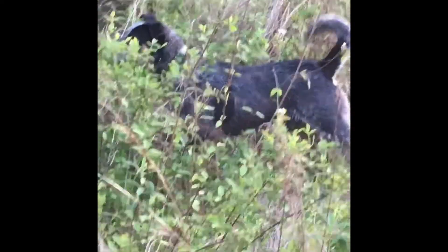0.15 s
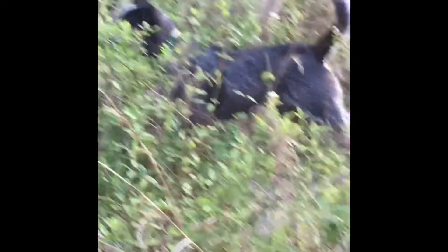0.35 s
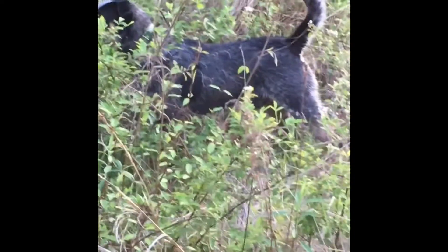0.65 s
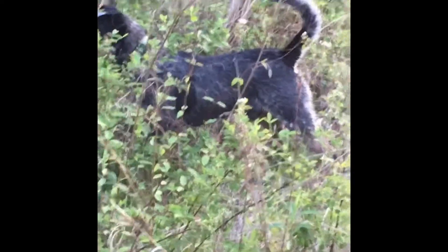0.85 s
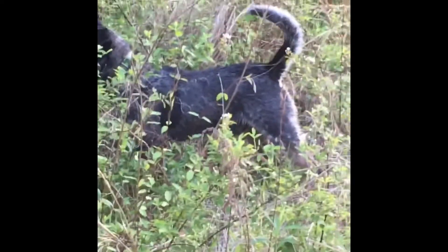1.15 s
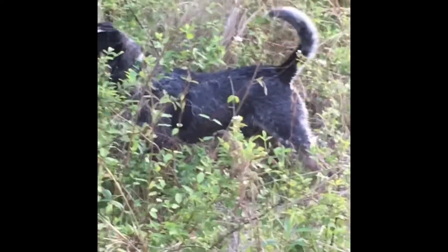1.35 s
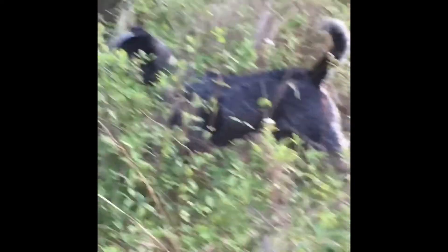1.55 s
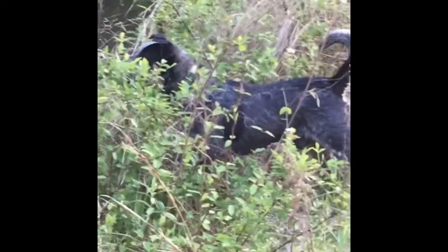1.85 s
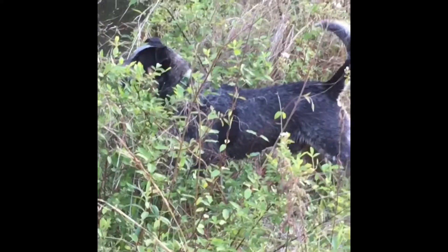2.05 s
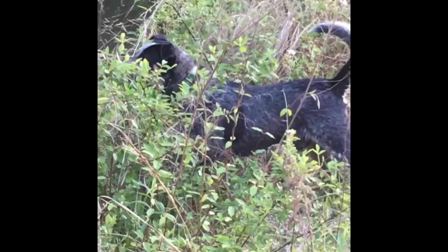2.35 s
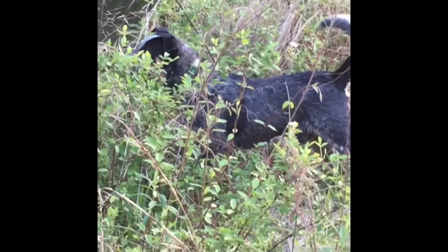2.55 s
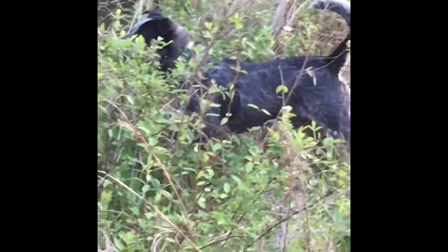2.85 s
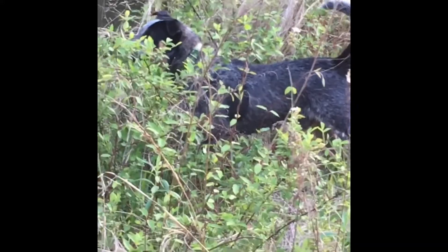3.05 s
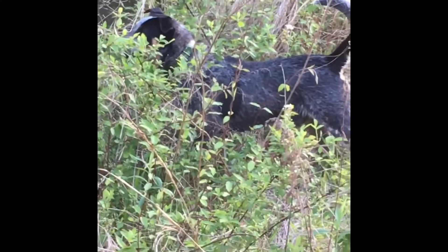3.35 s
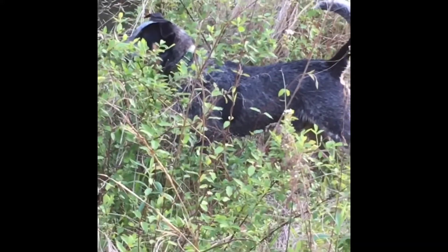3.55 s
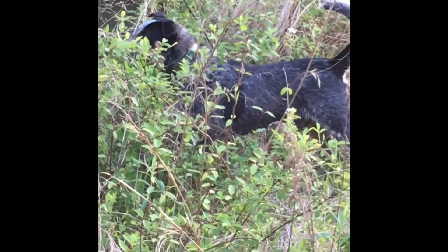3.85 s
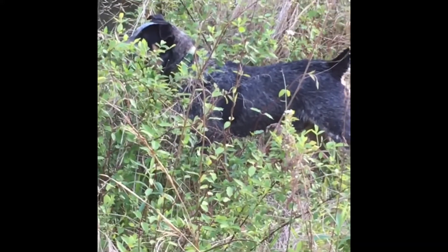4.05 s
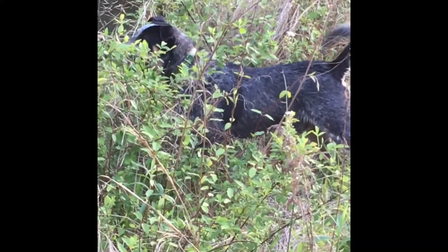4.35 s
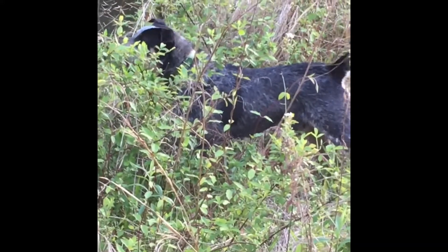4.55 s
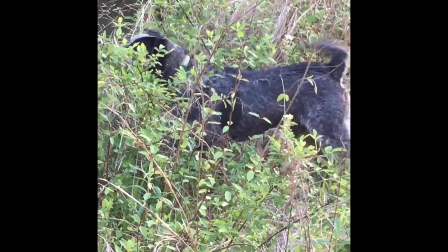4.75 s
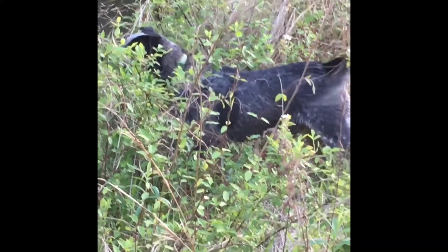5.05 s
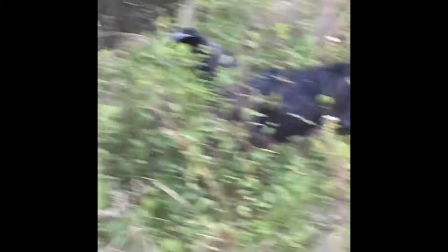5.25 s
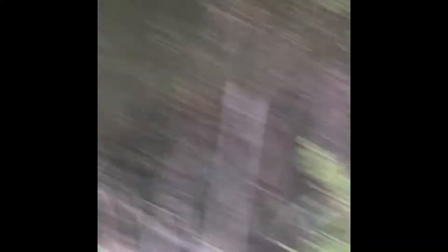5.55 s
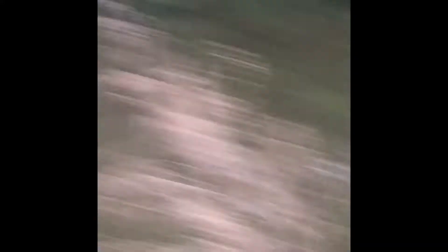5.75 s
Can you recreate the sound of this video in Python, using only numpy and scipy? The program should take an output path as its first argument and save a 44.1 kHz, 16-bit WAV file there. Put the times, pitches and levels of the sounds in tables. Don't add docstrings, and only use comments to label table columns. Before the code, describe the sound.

A large dog barks twice late on, sharp and rough, beside a pond, over a steady insect drone and soft low rumble.

```python
import sys
import numpy as np
from scipy import signal
from scipy.fft import rfft, irfft, next_fast_len
from scipy.io import wavfile
from scipy.ndimage import uniform_filter1d, map_coordinates

SR = 44100
rng = np.random.default_rng(int(sys.argv[2]) if len(sys.argv) > 2 else 0)


def magnitude_from_level(level_db):
    exponent = np.asarray(level_db, float) / 20
    return 10 ** exponent


def master(y):
    cut = np.clip(np.atleast_2d(y).T, -1, 1)
    pcm = np.round(cut * 32767)
    wavfile.write(sys.argv[1], SR, pcm.astype(np.int16))


N = 260454

# time in seconds, pitch in Hz, level in dB, brightness in dB per octave, roughness from 0 to 1.
LOW_FOLD = [
    [(4.600, 340, -50, -12, .5), (4.631, 295, -28, -16, .25), (4.643, 312, -6, -18, .1),
     (4.651, 410, -17, -5, .2), (4.668, 475, -12, -2, .2), (4.684, 492, -16, -2, .4),
     (4.708, 486, -44, -2, .4), (4.750, 468, -14, -4, .1), (4.773, 432, -22, -5, .1)],
    [(5.450, 350, -54, -8, .8), (5.473, 300, -22, -6, .8), (5.485, 305, -15, -10, .4),
     (5.494, 362, -2, -18, .05), (5.502, 402, -2, -19, .04), (5.511, 458, -6.5, -19, .1),
     (5.527, 487, -8, -15, .17), (5.545, 462, -17, -6, .28), (5.568, 456, -19, -5, .2)],
]
HIGH_FOLD = [
    [(4.644, 620, -13, -20, .1), (4.683, 680, -22, -12, .5), (4.690, 580, -4, -10, .25),
     (4.695, 562, -11, -6, .2), (4.701, 565, -3.2, -7, .04), (4.710, 565, -6, -6, .06),
     (4.717, 558, -2.8, -11, .05), (4.730, 518, -9, -15, .15), (4.750, 570, -24, -14, .3)],
    [(5.508, 680, -40, -9, .3), (5.520, 646, -15, -12, .3), (5.532, 600, -11, -10, .25),
     (5.542, 577, -4, -9, .08), (5.553, 550, -8, -16, .12), (5.570, 545, -21, -9, .15),
     (5.594, 450, -25, -8, .25), (5.612, 400, -50, -5, .3)],
]
# frequency in Hz, gain in dB.
THROAT = [(300, -24), (450, -4), (600, 0), (1000, 0), (1450, -1), (1900, -8), (2280, -5), (2450, -15),
          (2900, -20), (3600, -34), (6000, -45)]
# start in seconds, length in seconds, rasp level in dB, hiss level in dB.
PUFFS = [
    (4.61, 0.15, -18.5, -39),
    (5.455, 0.14, -17, -42),
]
# frequency in Hz, density in dB per Hz.
JAW_HISS = [(1760, -43), (3000, -2), (4150, -22.5), (4440, -8), (4890, -23), (5240, -11), (5810, -5.5),
            (7440, -11), (8370, -20.5), (9870, -13.5), (15600, -36)]
# frequency in Hz, density in dB per Hz.
THROAT_RASP = [(150, -25), (380, -33), (550, 4.5), (800, -1), (1300, -8), (1700, -8.5), (2200, -11),
               (2700, -21.5), (3300, -31), (5000, -45.5)]
# frequency in Hz, density in dB per Hz.
CHEST = [(90, -30), (140, -1), (260, -3), (380, -25), (600, -60)]
# frequency in Hz, decay time t60 in seconds.
TREE_DECAY = [(300, 1.78), (600, 1.1), (1200, 1.8), (2000, 1.78), (3500, 1.95), (6000, 1.55), (12000, 0.52)]
# delay in seconds, level in dB.
ECHOES = [
    (0.113, -32),
    (.24, -36),
    (.34, -73),
    (0.419, -41),
]
# frequency in Hz, density in dB per Hz.
CHORUS = [(1760, -35), (3000, -31.5), (3790, -21), (4320, -2), (4920, -0.5), (5240, -10.5), (5390, -24),
          (6050, -26), (7500, -4), (7970, -17), (8430, -22.5), (9280, -24), (10700, -34), (11600, -36),
          (15600, -33)]
# start in seconds, end in seconds, wing tone in Hz, strokes per second,
# stroke length in seconds, level in dB.
TRILLS = [
    (.0045, 1.222, 8310, 54.7, .008, -69),
    (1.343, 4.62, 8310, 54.7, .008, -69),
    (.0, 5.9, 7560, 52., .008, -70),
]
# time in seconds, pitch in Hz, level in dB.
FROG = [
    (.755, 347, -52),
    (.765, 321, -38.5),
    (.785, 331, -38),
    (.81, 310, -44),
    (.835, 296, -62),
]
# time in seconds, peak in dB, centre in Hz, decay time t60 in seconds.
TWIGS = [
    (.843, -56, 3200, .008),
    (3.975, -64, 2250, .04),
    (4.484, -54, 2250, .04),
    (4.598, -55, 2200, .05),
    (5.603, -30, 11500, .006),
]
# start in seconds, length in seconds, start pitch in Hz, turn pitch in Hz, level in dB.
BIRD_CALLS = [
    (.73, .05, 2400, 2390, -77),
    (.775, .12, 2390, 2335, -72),
    (2.135, .04, 6100, 6500, -74),
    (2.392, .053, 5900, 6350, -72),
    (2.66, .041, 5950, 6400, -70),
    (5.245, .085, 3850, 3250, -75),
    (5.375, .05, 3800, 3200, -73),
]
# time in seconds, level in dB.
ENGINE_SURGES = [(.86, -51), (1.49, -53), (1.76, -47.5), (2.0, -51), (2.5, -58), (2.9, -52), (3.45, -57),
                 (3.66, -41), (3.96, -44), (4.19, -47.5), (4.63, -49), (5.06, -49), (5.448, -47.5),
                 (5.92, -42)]
# frequency in Hz, density in dB per Hz.
ROAD = [(150, -9), (250, -13.5), (333, -10), (507, -9), (890, 0.5), (983, -3), (1090, -6), (1800, -19),
        (2900, -29.5), (3500, -30.5), (4550, -54), (7700, -120)]
# time in seconds, level in dB.
ROAD_LEVEL = [(0.0, -63.5), (0.74, -62), (1.98, -67), (2.63, -66.5), (3.03, -63.5), (3.71, -65.5),
              (4.46, -65), (4.5, -63)]
# frequency in Hz, density in dB per Hz.
RUMBLE = [(15, -87), (22, -42), (38, -15.5), (55, -1.5), (70, -9), (90, -3), (110, -8.5), (150, -21.5),
          (200, -27), (300, -30.5), (400, -59.5)]
# start in seconds, end in seconds, depth in dB.
DUCKING = [
    (4.668, 4.914, -2.5),
    (5.505, 5.672, -5),
]
# start in seconds, end in seconds.
COARSE_RANGE = [
    (4.64, 5.13),
    (5.49, 5.95),
]
# frequency in Hz, density in dB per Hz.
MIC_HISS = [(1500, 3), (3000, 1.5), (8000, -8.5), (15500, -10)]


def unit(x):
    return x / np.sqrt(np.mean(x ** 2) + 1e-20)


def along(points, hz):
    f, v = np.transpose(points)
    return np.interp(np.log(hz + 1), np.log(f + 1), v)


def curves(rows, t):
    s, *cols = np.transpose(rows)
    return [np.interp(t, s, c) for c in cols]


def span(rows):
    part = slice(round(rows[0][0] * SR), round(rows[-1][0] * SR))
    return part, np.arange(N)[part] / SR


def wobble(rate, size):
    knots = rng.standard_normal(int(size * 400 / SR) + 9)
    return map_coordinates(knots, [np.arange(size) * min(rate, 400) / SR])


def coloured(spectrum, patchy_db):
    z = signal.stft(rng.standard_normal(N + 512), nperseg=512)[2]
    field = uniform_filter1d(rng.standard_normal(z.shape), size=5, axis=0)
    field = uniform_filter1d(field, size=10, axis=1)
    x = signal.istft(z * magnitude_from_level(patchy_db * unit(field)), nperseg=512)[1]
    m = next_fast_len(N + 8192)
    shape = magnitude_from_level(along(spectrum, np.fft.rfftfreq(m, 1 / SR)))
    return unit(irfft(rfft(x, m) * shape, m)[:N])


def dog():
    low = fold(LOW_FOLD, odd_loss=2.6)
    high = fold(HIGH_FOLD, odd_loss=0)
    above = signal.butter(4, 800, "high", fs=SR, output="sos")
    sums = magnitude_from_level(-1) * signal.sosfilt(above, low * high)
    return low + high + sums + breath() + chest()


def fold(barks, odd_loss):
    out = np.zeros(N)
    k = np.arange(1, 15)[:, None]
    for rows in barks:
        part, t = span(rows)
        hz, db, tilt_db, rough = curves(rows, t)
        odd_db = odd_loss * np.minimum(tilt_db + 2, 0)
        hz = hz * (1 + .08 * rough * wobble(250, size=len(t)))
        levels_db = tilt_db * np.log2(k) + odd_db * (k % 2) + along(THROAT, k * hz)
        closing = np.clip((t - t[0]) / (t[-1] - t[0]) - .66, 0, 1)
        levels_db -= 150 * closing * np.log2(np.maximum(k * hz / 1300, 1))
        levels_db -= levels_db.max(axis=0)
        phase = k * 2 * np.pi * np.cumsum(hz) / SR + rng.uniform(-.3, .3, k.shape)
        stack = magnitude_from_level(levels_db) * np.sin(phase)
        swing = magnitude_from_level(db + 8 * rough * wobble(200, size=len(t))) * signal.windows.tukey(len(t), .1)
        out[part] = magnitude_from_level(.2) * swing * stack.sum(axis=0)
    return out


def breath():
    flutter = magnitude_from_level(1.5 * wobble(300, size=N))
    hiss_air = flutter * coloured(JAW_HISS, patchy_db=4.5)
    rasp_air = flutter * coloured(THROAT_RASP, patchy_db=2)
    hiss, rasp = np.zeros((2, N))
    t = np.arange(N) / SR
    for start, length, rasp_db, hiss_db in PUFFS:
        hiss += magnitude_from_level(hiss_db) * puff(t, start, length, [0, .15, .62, 1], [-43, -12, 0, -11.5, -28.5])
        rasp += magnitude_from_level(rasp_db) * puff(t, start, length, [0, .15, .45, .73, 1], [-36, -8.5, 0, 0, -20.5, -26])
    return magnitude_from_level(2.0) * hiss * hiss_air + magnitude_from_level(-1) * rasp * rasp_air


def puff(t, start, length, shares, levels_db):
    leak_s = 0.096
    times = np.append(start + length * np.array(shares), start + length + leak_s)
    edge = np.clip(np.minimum(t - start + .008, times[-1] - t) / .02, 0, 1)
    return edge * magnitude_from_level(np.interp(t, times, levels_db))


def chest():
    t = np.arange(N) / SR
    half_s = 0.012
    heaves = sum(np.exp(-((t - start - .004) / half_s) ** 2) for start, *_ in PUFFS)
    return magnitude_from_level(-45.5) * heaves * coloured(CHEST, patchy_db=-2.5)


def tree_line(x):
    hz, t, z = signal.stft(rng.standard_normal(SR + SR // 2), SR, nperseg=256)
    lumps = 1 + sum(magnitude_from_level(db + 38.5) * np.exp(-((t - s) / 0.0055) ** 2) for s, db in ECHOES)
    decay = magnitude_from_level(-60 * t / along(TREE_DECAY, hz)[:, None])
    tail = signal.istft(z * lumps * decay, SR, nperseg=256)[1]
    delayed = np.pad(x, (600, 0))
    return signal.fftconvolve(delayed, tail / np.linalg.norm(tail))[:N]


def insects():
    out = magnitude_from_level(-59.83) * coloured(CHORUS, patchy_db=-0.73)
    t = np.arange(N) / SR
    for start, end, hz, rate, length, db in TRILLS:
        since = ((t - start) * rate % 1) / rate
        stroke = np.sin(np.pi * np.clip(since / length, 0, 1)) ** 2 * (t >= start) * (t < end)
        turns = np.cumsum(hz + 25 * wobble(41, size=N)) / SR - 4000 * since ** 2
        level = magnitude_from_level(db + 8.5 + 1.5 * wobble(30.23, size=N))
        out += level * stroke * np.sin(2 * np.pi * turns)
    return out


def frog():
    out = np.zeros(N)
    part, t = span(FROG)
    hz, db = curves(FROG, t)
    phase = 2 * np.pi * np.cumsum(hz) / SR
    out[part] = magnitude_from_level(db + 2.5 * wobble(70, size=len(t))) * (np.sin(phase) + 0.11 * np.sin(3 * phase))
    return out


def twigs():
    out = np.zeros(N)
    u = np.arange(SR // 10) / SR
    for s, db, hz, t60 in TWIGS:
        wide = 1 + .003 / t60
        band = signal.butter(2, [hz / wide, hz * wide], "band", fs=SR, output="sos")
        tick = signal.sosfilt(band, rng.standard_normal(len(u)) * magnitude_from_level(-60 * u / t60))
        out[round(s * SR):][:len(u)] += magnitude_from_level(db) * tick / abs(tick).max()
    return out


def birds():
    out = np.zeros(N)
    for s, length, start_hz, turn_hz, db in BIRD_CALLS:
        size = round(length / 2 * SR)
        notes = (s, start_hz, turn_hz), (s + length / 2, turn_hz, start_hz)
        for begin, from_hz, to_hz in notes:
            turns = np.cumsum(np.linspace(from_hz, to_hz, size)) / SR
            out[round(begin * SR):][:size] = magnitude_from_level(db) * np.hanning(size) * np.sin(2 * np.pi * turns)
    return out


def far_hum():
    t = np.arange(N) / SR
    rumble = magnitude_from_level(-50) * coloured(RUMBLE, patchy_db=-0.5)
    turns = np.cumsum(81 + 2.5 * wobble(5, size=N)) / SR
    surge_s = 0.079
    swell = magnitude_from_level(-52.5) + sum(magnitude_from_level(db) * np.exp(-((t - s) / surge_s) ** 2) for s, db in ENGINE_SURGES)
    drone = magnitude_from_level(0.5) * swell * np.sin(2 * np.pi * turns)
    road = magnitude_from_level(curves(ROAD_LEVEL, t)[0] + 4.0) * coloured(ROAD, patchy_db=0.6)
    return rumble + drone + road


def gain():
    t = np.arange(N) / SR
    total_db = np.zeros(N)
    for start, end, db in DUCKING:
        drop = np.clip((t - start) / 0.011, 0, 1)
        recovery = np.exp(-np.clip(t - end, 0, None) / 0.036)
        total_db += db * drop * recovery
    return magnitude_from_level(total_db)


def scene():
    bark = dog() / gain()
    echo = magnitude_from_level(-24.5) * tree_line(bark)
    return (bark + echo + insects() + frog() + twigs() + birds() + far_hum())[None]


def band_limit(x):
    return signal.sosfilt(signal.butter(12, 15700, fs=SR, output="sos"), x)


def record(dry):
    t = np.arange(N) / SR
    loud_range = sum((t > a) * (t < b) for a, b in COARSE_RANGE)
    hiss = magnitude_from_level(-61) * loud_range * coloured(MIC_HISS, patchy_db=0)
    x = (dry + hiss) * gain()
    x = x / (1 + abs(x / .99) ** 40) ** (1 / 40)
    return band_limit(x)


dry = scene()
out = record(dry)
master(out)
```